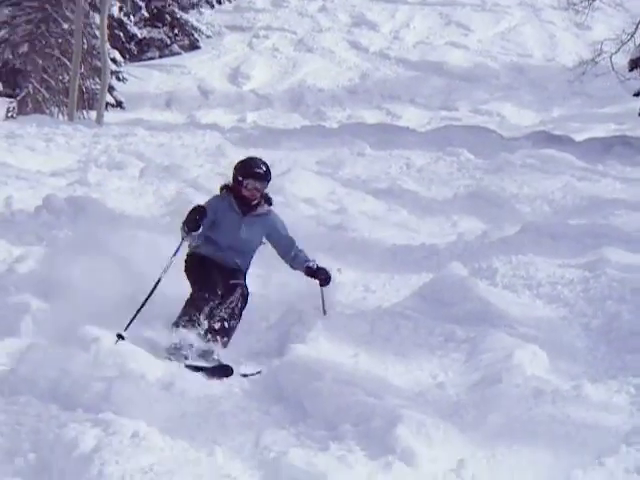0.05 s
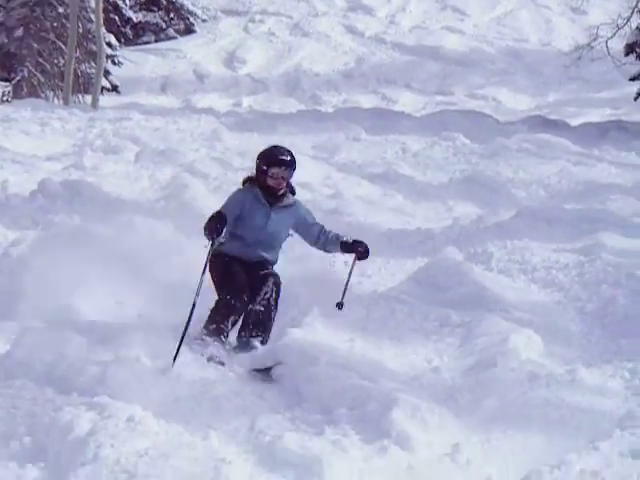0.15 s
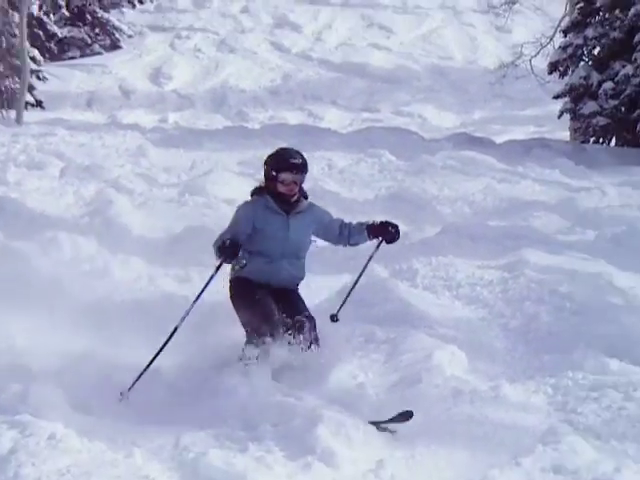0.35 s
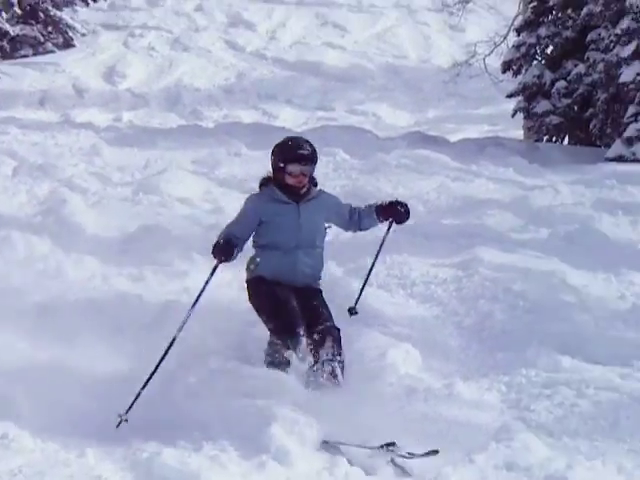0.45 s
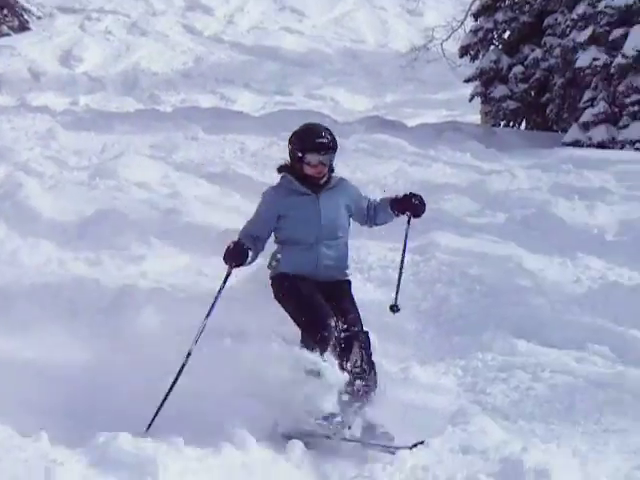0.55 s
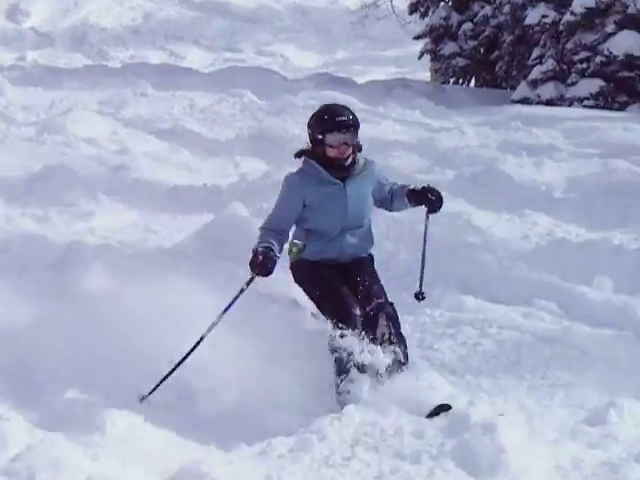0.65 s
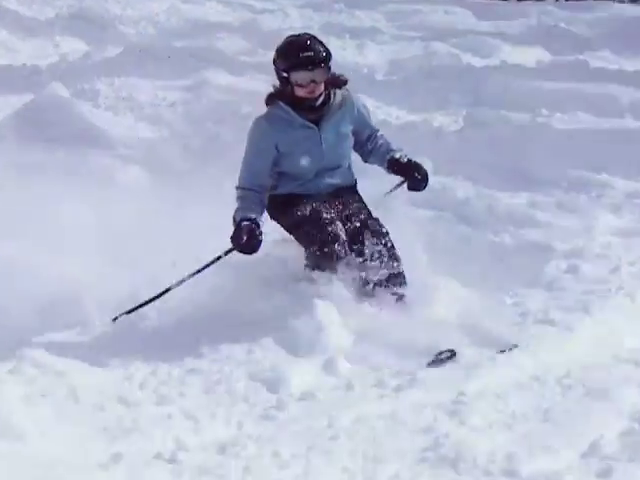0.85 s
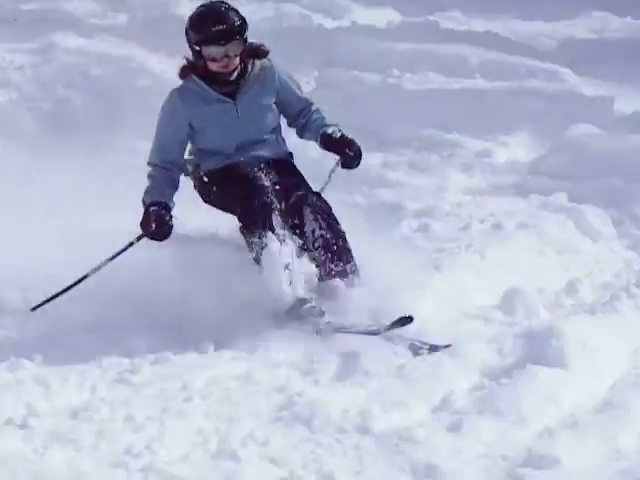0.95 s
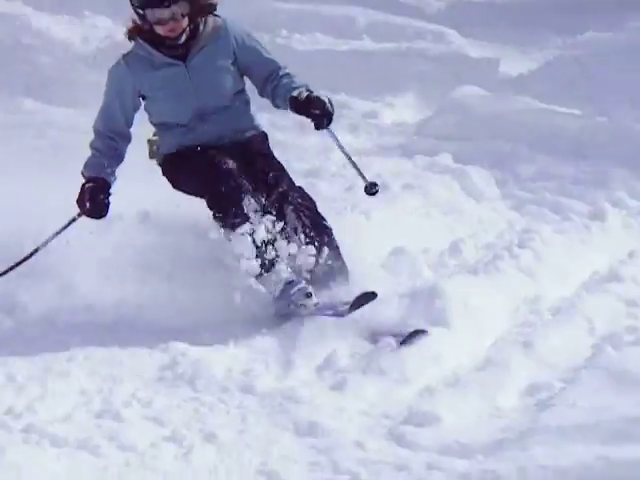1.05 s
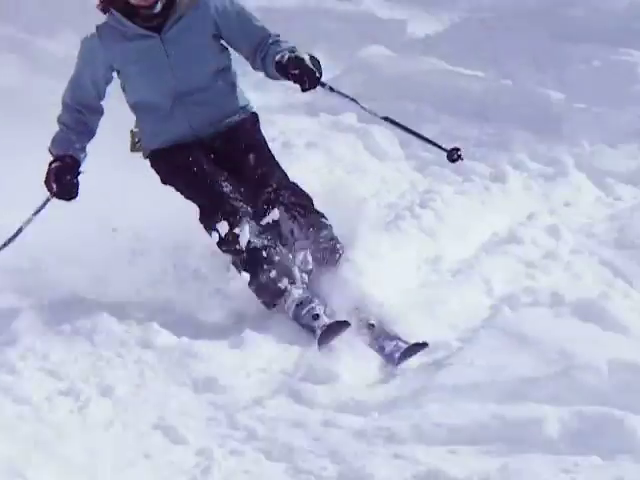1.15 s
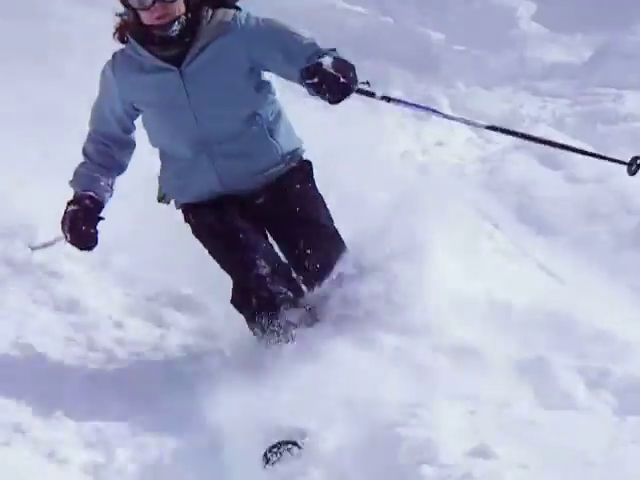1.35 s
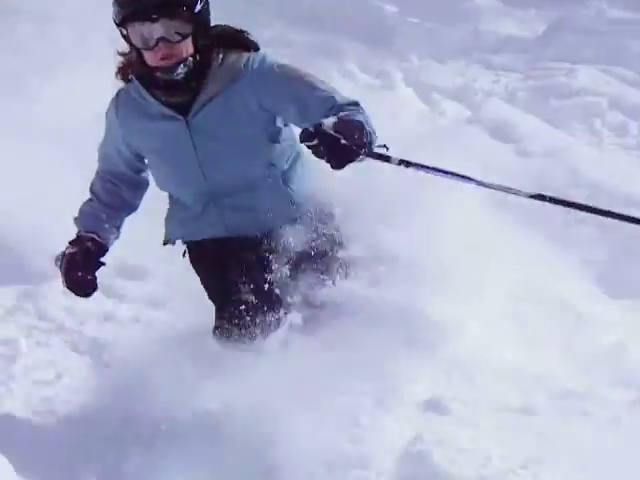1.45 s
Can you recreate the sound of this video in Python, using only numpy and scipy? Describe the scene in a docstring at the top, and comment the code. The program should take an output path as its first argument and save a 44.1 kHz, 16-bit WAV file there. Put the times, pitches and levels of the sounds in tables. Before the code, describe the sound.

A hard knock hits a hand-held camera, close and slightly distorted, followed by a small plastic click. Soft finger bumps continue over light wind and hiss, while a skier swishes faintly through powder on a snowy slope.

```python
"""A hard knock on a small hand-held camera: the pressed casing lets go, the body rings and overloads.
Loose plastic parts then drag and click. Fingers bump the body softly, light wind rumbles on the
microphone and a skier swishes faintly through powder. The camera stores the sound narrow-band
in coarse steps, which adds grain to the microphone's hiss."""
import sys
import numpy as np
from scipy import signal
from scipy.fft import rfft, irfft
from scipy.io import wavfile

SR = 44100
rng = np.random.default_rng(int(sys.argv[2]) if len(sys.argv) > 2 else 0)


def pcm_store(signal):
    """Save signal as 16-bit PCM."""
    levels = np.round(np.clip(np.atleast_2d(signal), -1, 1) * 32767)
    wavfile.write(sys.argv[1], SR, levels.astype(np.int16).T)


N = 66150


def amp(db):
    """Decibels to gain."""
    return 10 ** (np.asarray(db) / 20)


def noise(spectrum):
    """Noise of rms 1, shaped by (frequency [Hz], relative level [dB]) points."""
    hz, db = np.transpose(spectrum)
    bins_hz = np.fft.rfftfreq(N, 1 / SR)
    gain = amp(np.interp(np.log(bins_hz + 1), np.log(hz + 1), db))
    shaped = irfft(rfft(rng.standard_normal(N)) * gain, N)
    return shaped / shaped.std()


def since(at_s):
    """Seconds since at_s, per sample."""
    return np.arange(N) / SR - at_s


def swell(at_s, half_s):
    """Gaussian envelope, down to 1/e at half_s from its peak."""
    return np.exp(-(since(at_s) / half_s) ** 2)


def ring(modes, at_s):
    """Decaying modes struck at at_s."""
    t = np.maximum(since(at_s), 0)
    return sum(amp(db) * np.exp(-np.log(1000) * t / t60_s) * np.sin(2 * np.pi * hz * t)
               for hz, db, t60_s in modes)


# Microphone noise spectrum (frequency [Hz], relative level [dB])
HISS_SPECTRUM = [(100, -0.5), (600, 1.5), (1200, 1.5), (2500, 0.5), (3700, 3.5), (4300, -3), (6000, -22.5)]

def hiss(level_db=-52):
    """Steady microphone noise."""
    return amp(level_db) * noise(HISS_SPECTRUM)


# Buffeting spectrum (frequency [Hz], relative level [dB])
WIND_SPECTRUM = [(10, -17), (25, -20), (60, -22), (120, -27), (240, -33), (450, -43.5), (900, -58),
                 (3000, -70)]
# Wind strength (time [s], level [dB])
GUSTS = [(0, -49.5), (0.199, -45), (.33, -47), (0.451, -50.5), (0.621, -54), (0.742, -49.5), (.83, -45),
         (1.0, -46.5), (1.17, -48), (1.349, -42.5), (1.5, -44)]
# Pressure swing spectrum (frequency [Hz], relative level [dB])
SWAY_SPECTRUM = [(1, 0), (4, -3), (12, -14.5), (25, -30.5), (80, -59)]

def wind(sway_db=-38):
    """Gusts buffet the microphone over slow swings of air pressure."""
    gust_gain = amp(np.interp(since(0), *np.transpose(GUSTS)))
    return gust_gain * noise(WIND_SPECTRUM) + amp(sway_db) * noise(SWAY_SPECTRUM)


# Displaced snow spectrum (frequency [Hz], relative level [dB])
POWDER_SPECTRUM = [(100, -11.5), (220, -2.5), (350, -1.5), (450, -5), (560, -16.5), (1000, -15.5),
                   (2000, -20), (4000, -23.5)]
# Ski pushes (time [s], half-length [s], level [dB])
SWISHES = [(1.079, 0.026, -44), (1.458, 0.077, -50.5)]

def skis():
    """Skis push powder aside in soft swells."""
    envelope = sum(amp(db) * swell(at_s, half_s) for at_s, half_s, db in SWISHES)
    return envelope * noise(POWDER_SPECTRUM)


# Slipping skin spectrum (frequency [Hz], relative level [dB])
RUB_SPECTRUM = [(60, -3), (150, 0), (500, -0.5), (750, -13.5), (2000, -28.5), (4000, -33.5)]
# Finger bumps (time [s], level [dB], pitch [Hz])
BUMPS = [(0.0768, -27.5, 210), (0.167, -34.5, 169), (0.196, -35, 174), (0.2753, -31, 270), (.302, -38, 69),
         (0.422, -34, 69), (0.7842, -25.5, 229.6), (.8215, -34.5, 620), (0.828, -34.5, 124),
         (.853, -40.5, 330), (.893, -34.5, 196), (0.959, -36.5, 128.7), (1.267, -39.5, 280),
         (1.368, -32.5, 130.7)]

def bumps(spread_cycles=0.23, rub_db=-16.5, rub_half_s=0.0046):
    """Dull finger pushes, damped within about one swing, each with a little skin rub."""
    rub = amp(rub_db) * noise(RUB_SPECTRUM)
    total = np.zeros(N)
    for at_s, db, hz in BUMPS:
        thud = swell(at_s, np.sqrt(2) * spread_cycles / hz) * np.cos(2 * np.pi * hz * since(at_s))
        total += amp(db) * (thud + rub * swell(at_s, rub_half_s))
    return total


# Plastic friction spectrum (frequency [Hz], relative level [dB])
DRAG_SPECTRUM = [(200, -7), (800, -5.5), (1200, -14), (1700, -0.5), (2200, -6), (2800, -4), (4000, -3.5)]
# Casing modes (frequency [Hz], level [dB], t60 [s])
CASING_MODES = [(197.4, -6.5, 0.016), (833, -2.5, 0.013), (1400, -20, 0.016), (1630, -2.5, 0.0046),
                (2033, -1.5, .005), (2542, 1.5, 0.0091), (3350, -8.5, .004)]
# Casing clicks (time [s], level [dB], second strike delay [s], low cut [Hz])
CLICKS = [(0.4283, -27.5, 0.00034, 1500), (0.4932, -14.5, 0.000708, 300), (0.5075, -38, .0007, 900)]

def clicks(second_strike_db=-5.5, drag_db=-27, drag_lead_s=0.011, drag_half_s=0.018):
    """A loose part drags, then strikes twice; each click's own low cut sets how thin it sounds."""
    total = np.zeros(N)
    for at_s, db, delay_s, low_cut_hz in CLICKS:
        strikes = ring(CASING_MODES, at_s) + amp(second_strike_db) * ring(CASING_MODES, at_s + delay_s)
        thinned = signal.sosfilt(signal.butter(1, low_cut_hz, "high", fs=SR, output="sos"), strikes)
        drag = amp(drag_db) * noise(DRAG_SPECTRUM) * swell(at_s - drag_lead_s, drag_half_s)
        total += amp(db) * (thinned + drag)
    return total


# Camera body modes (frequency [Hz], level [dB], t60 [s])
BODY_MODES = [(105.1, -5.5, .025), (155.8, -13.5, 0.03), (201.2, -27.5, .095), (352.6, -40, 0.043),
              (460, -37, 0.033), (608, -19, 0.013), (970, -12, 0.011), (1375, -19, 0.0096)]

def knock(at_s=0.36858, gain_db=9.5, build_s=0.00048, release_s=0.00047):
    """Force builds on the casing and lets go at once; the body swings back and rings."""
    t = since(at_s)
    release = (1 - np.tanh(t / release_s)) / 2
    push = np.exp(-abs(t) / build_s) * release
    return amp(gain_db) * (push - ring(BODY_MODES, at_s))


def scene():
    """Mono sum at the microphone."""
    handling = knock() + clicks() + bumps()
    return (handling + wind() + skis() + hiss())[None]


FULL_SCALE, STEPS_PER_POLARITY = 0.707, 128
ROLLOFF_HZ, STORE_RATE_HZ, BAND_LIMIT_HZ = 2624, 7875, 15500

def record(dry):
    """Camera chain: overload, treble roll-off, low-rate coarse storage, playback clip, band limit."""
    overloaded = np.clip(dry, -FULL_SCALE, FULL_SCALE)
    dull = signal.sosfiltfilt(signal.butter(2, ROLLOFF_HZ, fs=SR, output="sos"), overloaded)
    sampled = signal.resample_poly(dull, STORE_RATE_HZ, SR, axis=1)
    step = FULL_SCALE / STEPS_PER_POLARITY
    stored = np.round(sampled / step) * step
    played = signal.resample_poly(stored, SR, STORE_RATE_HZ, axis=1, window=("kaiser", 7))
    played = np.clip(played[:, :N], -FULL_SCALE, FULL_SCALE)  # overshoot clips again
    band_limit = signal.firwin(511, BAND_LIMIT_HZ, window=("kaiser", 9), fs=SR)
    return signal.oaconvolve(played, band_limit[None], "same")


dry = scene()
out = record(dry)
pcm_store(out)
```